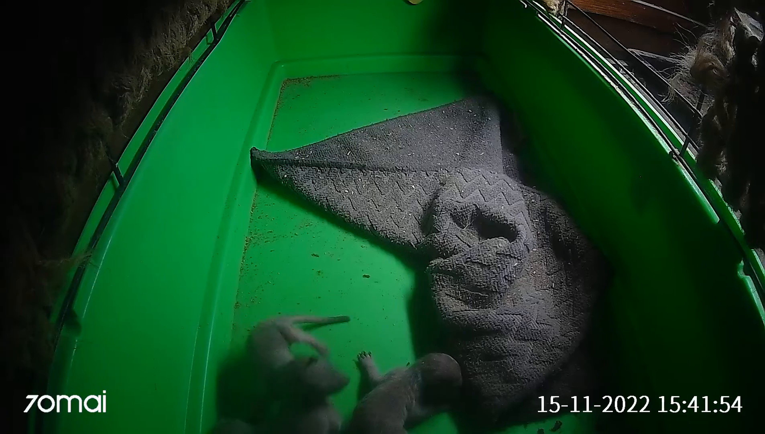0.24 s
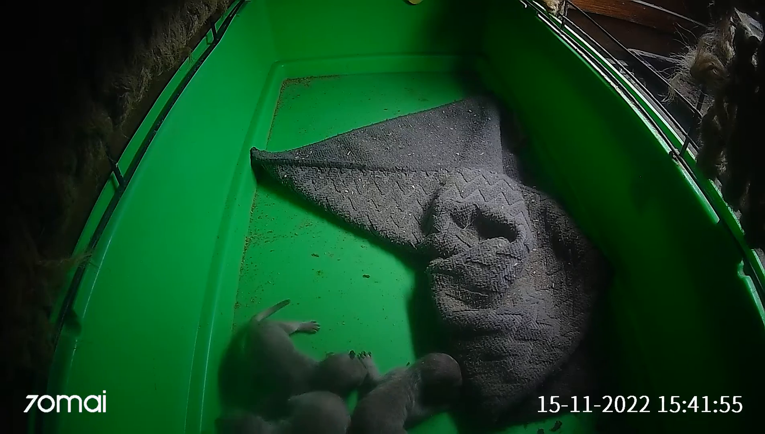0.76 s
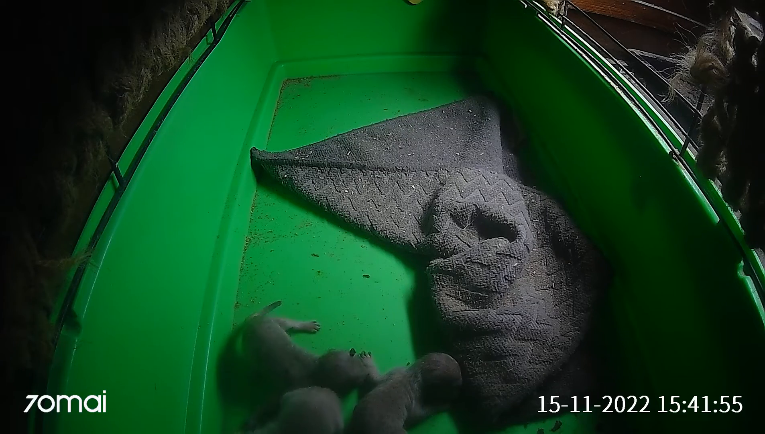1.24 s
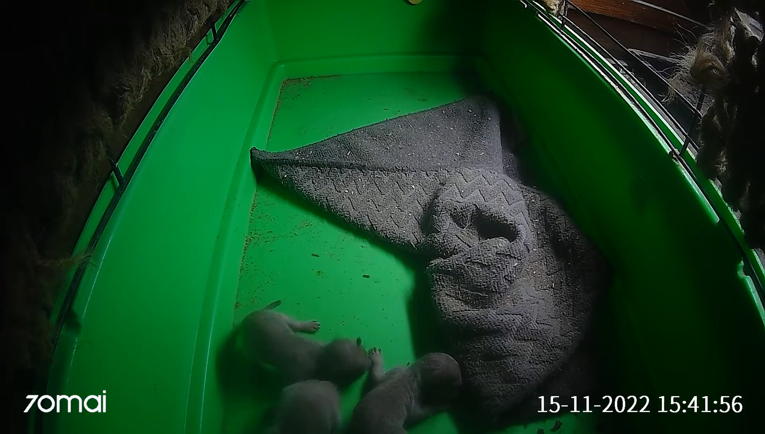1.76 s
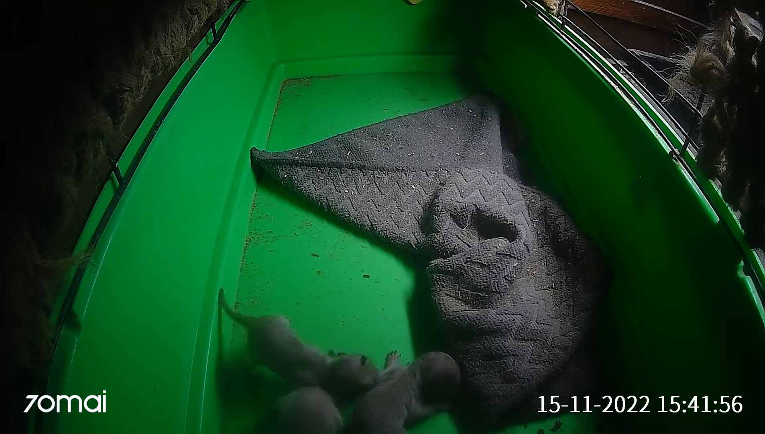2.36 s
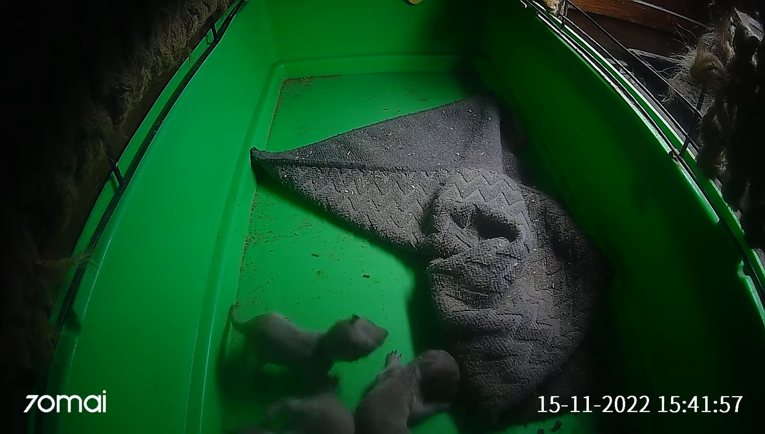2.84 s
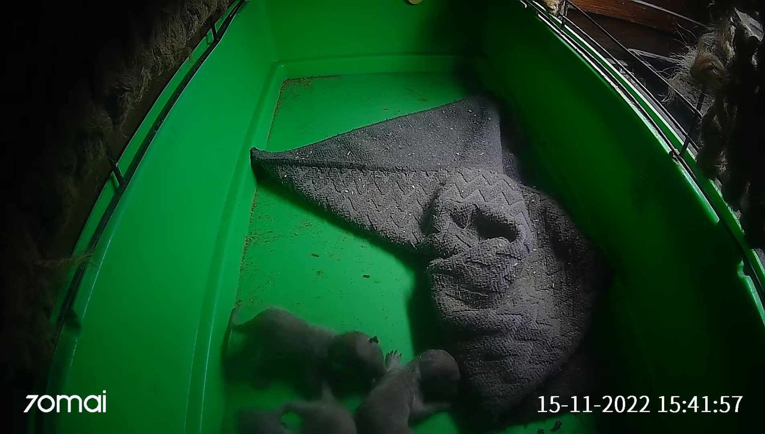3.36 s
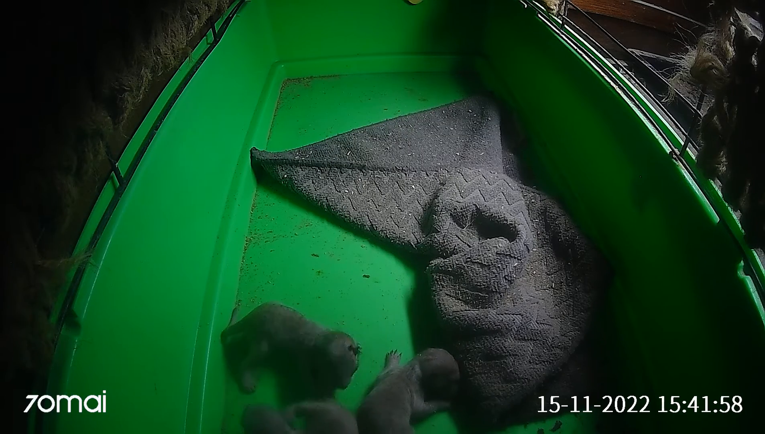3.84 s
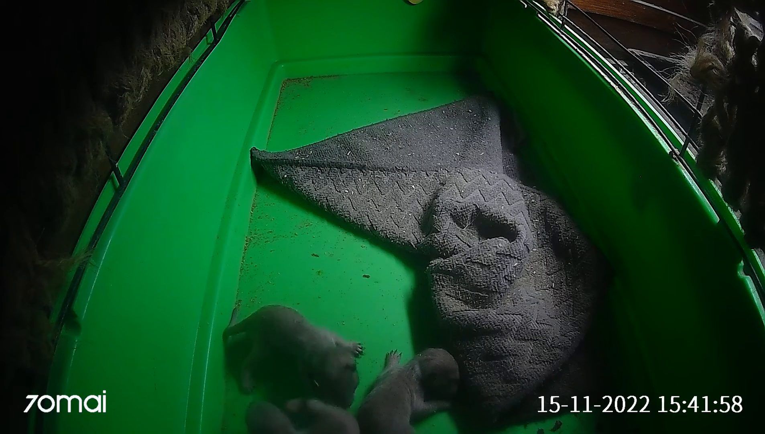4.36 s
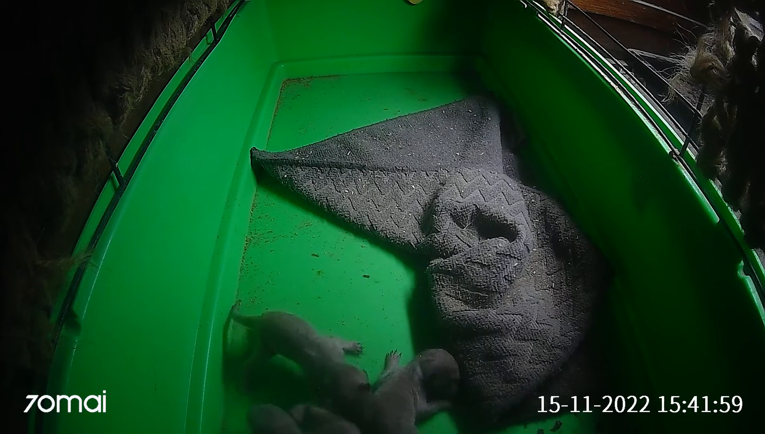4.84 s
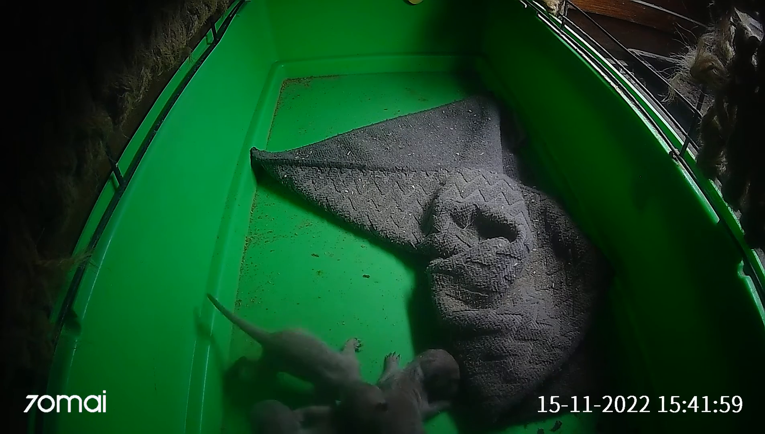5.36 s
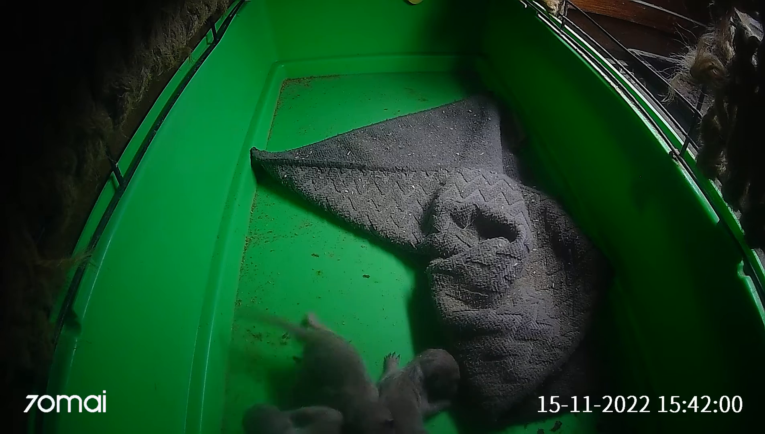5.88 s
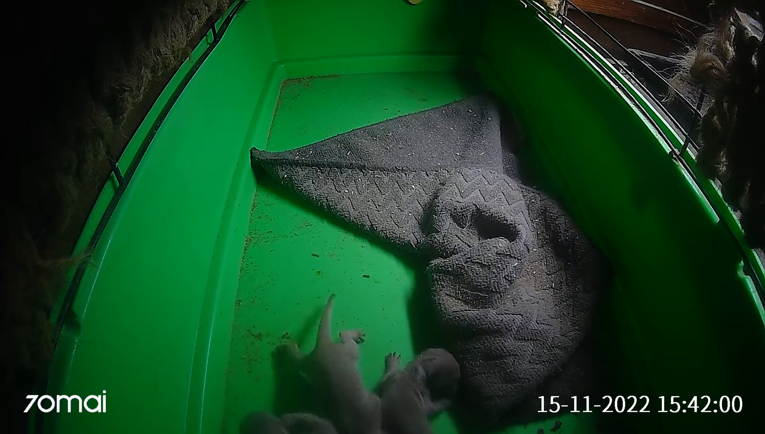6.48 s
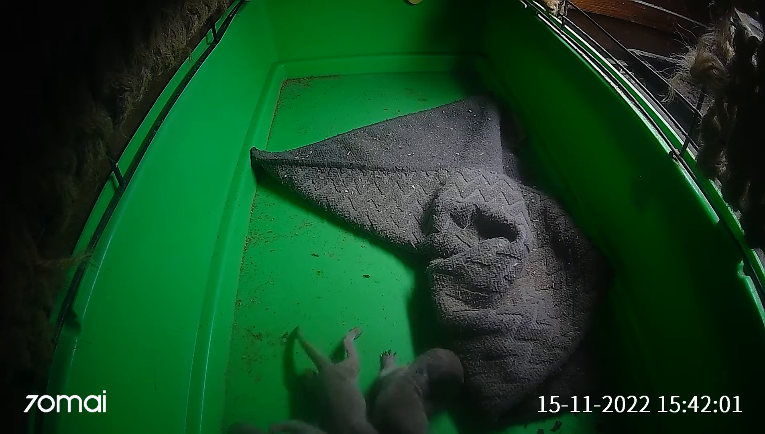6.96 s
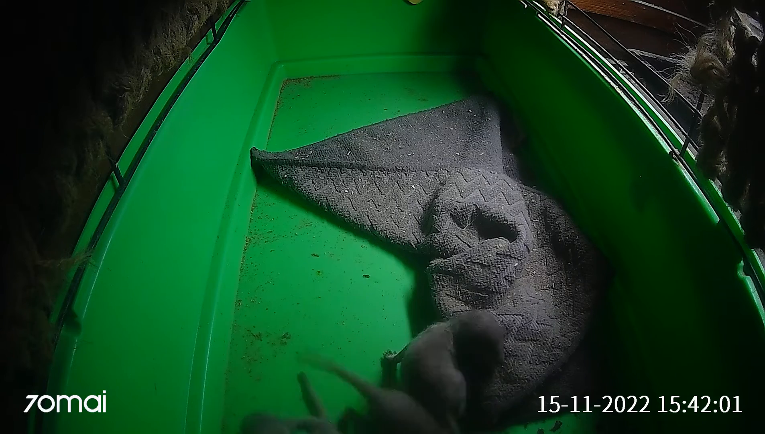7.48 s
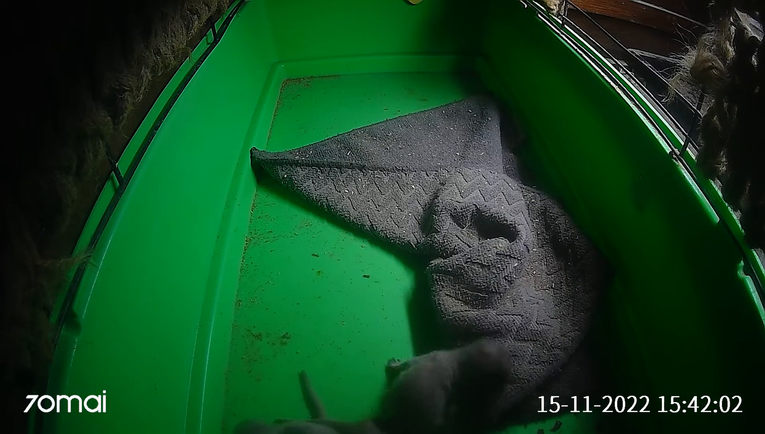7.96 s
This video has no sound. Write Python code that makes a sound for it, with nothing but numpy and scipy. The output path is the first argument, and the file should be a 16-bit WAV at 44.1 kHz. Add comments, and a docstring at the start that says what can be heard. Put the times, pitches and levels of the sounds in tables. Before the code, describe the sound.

Close, short peeps and raspy trills of baby meerkats, rustling on a blanket and bumping their plastic tub over faint hiss.

```python
"""Inside a plastic tub, a small camera microphone close to meerkat pups that peep, trill and whimper.
Each call is a short harmonic note; in a trill, pitch and strength swing together and the voice turns
raspy in the dips. The pups shuffle over the floor and a blanket, tick their claws on the plastic and
bump the tub into a low ring. Underneath lie rumble, microphone hiss and a faint electrical ticking."""
import sys
import numpy as np
from scipy import signal
from scipy.fft import rfft, irfft, next_fast_len
from scipy.io import wavfile

SR = 44100
rng = np.random.default_rng(int(sys.argv[2]) if len(sys.argv) > 2 else 0)


def put_to_file(sound):
    """Save the sound as 16-bit audio at rate SR, in the file named by the first command-line argument."""
    columns = np.atleast_2d(sound).T  # one column per channel
    safe = np.clip(columns, -1, 1)
    whole_steps = np.round(safe * 32767)
    wavfile.write(sys.argv[1], SR, whole_steps.astype(np.int16))


N = 362502
TIME = np.arange(N) / SR

# spectrum of fur and paws rubbing: f/Hz, level/dB
RUB_SPECTRUM = [(150, -16.5), (300, 4), (600, 4), (900, 5.5), (1500, 5), (2400, -0.5), (3500, -3.5),
                (5500, -5.5), (8000, -21)]


def from_db(db):
    """Decibels to gain."""
    return 10 ** (np.asarray(db) / 20)


def unit_rms(x):
    """Scale to unit power."""
    return x / np.sqrt(np.mean(x ** 2) + 1e-20)


def curve(points):
    """A curve of (time, value) points at every sample."""
    return np.interp(TIME, *np.transpose(points))


def gain_at(spectrum, hz):
    """Gain of a spectrum at the given frequencies."""
    f, db = np.transpose(spectrum)
    return from_db(np.interp(np.log(np.maximum(hz, 1)), np.log(f), db))


def noise(spectrum):
    """Steady noise of a given colour, rms 1."""
    size = next_fast_len(N)
    hz = np.fft.rfftfreq(size, 1 / SR)
    no_dc = hz / np.hypot(hz, spectrum[0][0] / 2)
    return unit_rms(irfft(rfft(rng.standard_normal(size)) * gain_at(spectrum, hz) * no_dc, size)[:N])


def lowpass(x, hz):
    """Second-order low-pass."""
    return signal.sosfilt(signal.butter(2, hz, fs=SR, output="sos"), x + 1e-18)


def drift(hz):
    """Random wavering up to a given rate, rms 1."""
    return unit_rms(lowpass(rng.standard_normal(N + SR), hz)[SR:])


def decay(clicks, seconds):
    """Give each click an exponential tail."""
    return signal.lfilter([1], [1, -np.exp(-1 / (seconds * SR))], clicks + 1e-18)


def ring(x, hz, t60):
    """One mode: a unit click sets a sine of height 1 ringing."""
    r, w = from_db(-60 / (t60 * SR)), 2 * np.pi * hz / SR
    return signal.lfilter([0, np.sin(w)], [1, -2 * r * np.cos(w), r * r], x + 1e-18)


def background(floor_db=-56, tick_hz=48.9, tick_chance=0.45, tick_db=-64.5):
    """Rumble and hiss, with faint dull electrical ticks in random slots of a steady beat."""
    # noise floor: f/Hz, relative level/dB
    floor_spectrum = [(12, -27), (20, 1), (59, -3.5), (124, -19.5), (156, -13.5), (222, -15.5),
                      (407, -21.5), (566, -20), (659, -23.5), (1070, -25.5), (1410, -28), (5530, -32.5),
                      (8500, -42), (11000, -87), (18700, -120)]
    slots = np.arange(0, N - 1, SR / tick_hz).astype(int)
    ticks = np.zeros(N)
    ticks[slots] = (rng.random(len(slots)) < tick_chance) * rng.random(len(slots))
    dull = signal.sosfilt(signal.butter(1, 40, "high", fs=SR, output="sos"), lowpass(ticks, hz=216))
    return from_db(floor_db) * noise(floor_spectrum) + from_db(tick_db) * unit_rms(dull)


def rustle(stroke_db=3.5, grain_db=2.0, snags_per_s=25, snag_db=1.5):
    """Fur and paws rub in grainy strokes and claws snag; the same noise gives short rasps by the trills."""
    # how hard the pups rub as they start to clamber: t/s, effort/dB
    clambering = [(5.3, -80), (5.62, -65.5), (5.78, -57), (6.2, -62), (6.45, -60.5), (6.7, -69),
                  (7.14, -64), (7.81, -70), (8.22, -53)]
    # short rasps just before or after a trill (0.5, 0.731, 2.396 s), otherwise soft rubbing swipes:
    # t/s, level/dB, half-width/s
    rasps_and_swipes = [(0.135, -60, 0.21), (0.5, -48.5, .014), (0.731, -50, .012), (2.237, -56.5, 0.0049),
                        (2.264, -63, 0.06), (2.304, -57, 0.01), (2.396, -49.5, 0.011),
                        (4.829, -60.5, 0.019), (5.57, -62, 0.01), (7.865, -55, 0.041)]
    strokes = from_db(stroke_db * drift(hz=15.3) + grain_db * drift(hz=400))
    snags = decay((rng.random(N) < snags_per_s / SR) * rng.random(N), seconds=0.0018)
    grainy = unit_rms((strokes + from_db(snag_db) * snags) * noise(RUB_SPECTRUM))
    bursts = sum(from_db(db) * np.exp(-np.minimum(((TIME - s) / width) ** 2, 20))
                 for s, db, width in rasps_and_swipes)
    rubbing_db = -59 + 1.21 * (curve(clambering) + 63)   # grows a little faster than the effort
    return (from_db(rubbing_db) + bursts) * grainy


def claws(decay_s=0.007, gain_db=8.5):
    """Claws strike the plastic in short, dry ticks of noise."""
    # claw strikes: t/s, relative level/dB
    strikes = [(6.017, -48), (6.949, -53.5), (7.445, -55.5), (7.521, -47)]
    # spectrum of a tick: f/Hz, level/dB
    tick_spectrum = [(300, -6), (600, -5.5), (1500, -1.5), (3000, -9.5), (5000, -23), (8000, -28)]
    envelope = sum(from_db(db + gain_db) * (TIME >= s) * np.exp(-np.minimum(abs(TIME - s) / decay_s, 20))
                   for s, db in strikes)
    return envelope * noise(tick_spectrum)


def tub_bumps(ring_db=-5.5, db_per_octave=8.0, scuff_db=-4.5):
    """A body lands and scuffs along the tub, ringing the modes near the blow's favoured pitch most."""
    # bumps: t/s, relative level/dB, scuff against that level/dB, favoured f/Hz
    bumps = [(0.413, -39, -14, 236), (0.719, -29, -5.5, 104), (0.775, -35.5, -27, 93),
             (5.958, -30, -13, 224), (7.087, -33.5, -28, 105), (7.495, -20.5, -21, 114),
             (7.508, -21.5, -17, 96), (7.637, -37, -3, 470), (7.667, -31, -15, 248),
             (7.812, -31.5, -31, 109)]
    # modes of the tub: f/Hz, level/dB, t60/s
    modes = [(64, -2.5, 0.11), (97.2, -1.5, 0.27), (112.7, -5, 0.23), (147, -24, 0.097), (220, -3, 0.11),
             (280, -7, 0.12), (330, -13.5, 0.26), (474, 6, 0.043), (623, 1, 0.11)]
    s, blow_db, rub_db, favoured_hz = np.transpose(bumps)
    at = (s * SR).astype(int)
    blows, ringing = np.zeros((2, N))
    for hz, mode_db, t60 in modes:
        off_pitch_db = db_per_octave * abs(np.log2(hz / favoured_hz))
        blows[at] = from_db(ring_db + blow_db + mode_db - off_pitch_db + rng.normal(0, 1, len(at)))
        ringing += ring(lowpass(blows, hz=600), hz, t60) * rng.choice([-1, 1])
    blows[at] = from_db(blow_db + rub_db + scuff_db)
    scuff = decay(blows, seconds=0.014) * lowpass(noise(RUB_SPECTRUM), hz=1310)
    return ringing + scuff


def tub_boom(gain_db=1.0):
    """Shifting weight keeps the tub's lowest modes booming."""
    # strength of the shuffling: t/s, relative level/dB
    shuffling = [(0.0, -67), (0.34, -74), (0.82, -61.5), (1.94, -70.5), (2.77, -68), (3.2, -76),
                 (3.66, -68), (3.8, -66.5), (5.13, -69), (5.59, -69.5), (5.97, -52), (6.34, -67.5),
                 (6.94, -59.5), (7.56, -45.5), (8.22, -51.5)]
    # low modes: f/Hz, level/dB, t60/s
    low_modes = [(49.6, -9, 0.2), (99.4, -5.5, 0.15), (117.3, -4, 0.23)]
    push = lowpass(rng.standard_normal(N), hz=162)
    boom = unit_rms(sum(from_db(db) * ring(push, hz, t60) for hz, db, t60 in low_modes))
    return from_db(curve(shuffling) + gain_db) * boom


def whimpers(throb_hz=25.0, second_db=-20.0, third_db=-18.5, attack_s=0.035, release_s=0.016):
    """Nearly pure, low notes from a closed mouth, unsteady and throbbing."""
    # whimpers: start/s, end/s, f/Hz, level/dB, fade over the note/dB
    notes = [(2.623, 2.783, 522, -43.5, 25), (4.228, 4.611, 500.4, -47, 9), (6.02, 6.965, 465.2, -45.5, 8),
             (6.616, 6.974, 331, -57.5, 4), (7.7, 7.965, 471, -58, -1)]
    wobble = 1 + 0.035 * drift(hz=70)
    throb = 1 + 0.5 * np.cos(2 * np.pi * throb_hz * TIME) + 0.5 * drift(hz=65.5)
    out = np.zeros(N)
    for start, end, hz, db, fade_db in notes:
        span = slice(int(start * SR), int(end * SR))
        t = TIME[span]
        progress = (t - start) / (end - start)
        pitch = hz * (1 + 0.16 * np.exp(-progress / 0.06))   # starts high and settles
        phase = 2 * np.pi * np.cumsum(pitch * wobble[span]) / SR
        note = np.sin(phase) + from_db(second_db) * np.sin(2 * phase)
        note += from_db(third_db) * np.sin(3 * phase)
        gate = np.clip(np.minimum((t - start) / attack_s, (end - t) / release_s), 0, 1)
        out[span] += from_db(db - fade_db * progress) * gate * unit_rms(note * throb[span])
    return out


def throat(phase, pitch, note_hz, overtones_db, odd_db=-4.0, waver_db=6.0, waver_s=0.012):
    """Two low harmonics, and overtones coloured by the throat: odd ones weaker, each wavering alone."""
    # throat response: f/Hz, level/dB
    response = [(1500, 20.5), (2200, 3.5), (2550, 1), (2900, -1), (3500, -8), (4300, -8.5), (5200, -14.5),
                (6000, -32), (8000, -28.5)]
    # fundamental against the second harmonic, by pitch of the note: f/Hz, level/dB
    fundamental = [(600, -2), (700, -9.5), (780, -15.5), (880, 0), (960, -6), (1060, 4.5), (1250, 12),
                   (1650, 6.5)]
    k = np.arange(3, 15)[:, None]
    steps = np.arange(len(phase)) / (waver_s * SR)
    waver = np.array([np.interp(steps, np.arange(30), row) for row in rng.normal(0, 1, (len(k), 30))])
    gains = gain_at(response, k * pitch) * from_db(odd_db * (k % 2) + waver_db * waver)
    gains *= k * pitch < SR / 4
    smear = 0.55 * (k - 2) ** 2   # higher partials come later in each pulse
    overtones = unit_rms(np.sum(gains * np.cos(k * phase - smear), axis=0))
    low = gain_at(fundamental, note_hz) * np.cos(phase) + np.cos(2 * phase)
    return unit_rms(low + from_db(overtones_db) * overtones / np.sqrt(2))


def call(row, noises, release_s=0.0033, jitter=0.061, shimmer=0.25, rasp_db=0.5, hiss_db=-23.5):
    """One peep or trill: the voice arches, lower, weaker and rougher at its ends and in trill dips."""
    start, end, hz, glide, db, fade_db, overtones_db, rough, *trill = row
    span = slice(int(start * SR), min(int((end + release_s) * SR), N))
    t, length = TIME[span] - start, end - start
    flutter, shake, rasp, hiss, bend = noises[:, span]
    progress = np.clip(t / length, 0, 1)
    from_middle = progress - 0.5
    edge = (2 * from_middle) ** 2
    catch = 1 + 0.1273 * np.exp(-t / 0.00318)   # starts high and settles at once
    pitch = hz * (1 + glide * from_middle - 0.05204 * edge) * catch
    level_db = db - fade_db * from_middle - 5.5 * edge
    rough = rough * (1 + 1.2 * edge)
    if trill:
        rate, delay, swing_db, swing_hz = trill
        since = t - delay
        dip = np.sin(np.pi * rate * np.maximum(since, 0)) ** 2
        # pitch trails strength, so that every pulse swoops upward
        pitch_dip = np.sin(np.pi * rate * np.maximum(since - 0.0022, 0)) ** 2
        climb = 1 - 0.0594 * np.clip(-since / 0.0206, 0, 1)   # rises into the trill
        pitch = pitch * climb - swing_hz * pitch_dip
        level_db -= swing_db * dip
        rough *= 0.15 + 1.93 * dip
    else:
        push_db = 2 * np.exp(-((progress - 0.6) / 0.071) ** 2)   # a peep is pushed just past its middle
        level_db += push_db - push_db.mean()
    rough = np.clip(rough, 0, 1)
    phase = 2 * np.pi * np.cumsum(pitch * (1 + 0.012 * bend + jitter * rough * flutter)) / SR
    bloom_db = -2 * np.exp(-t / 0.011)   # the overtones come in after the lowest partials
    voice = throat(phase, pitch, hz, overtones_db + bloom_db) * (1 + shimmer * rough * shake)
    # air escapes in puffs, once a cycle
    air = (1 + 0.63 * np.cos(phase)) * (from_db(rasp_db) * rough * rasp + from_db(hiss_db) * hiss)
    attack_s = 0.004 * (930 / hz) ** 2.94   # lower voices speak more slowly
    attack = np.clip(t / attack_s, 0, 1)
    release = np.clip((length + release_s / 2 - t) / (2 * release_s), 0, 1) ** 2
    return span, from_db(level_db) * attack * release * unit_rms(voice + air)


def pups():
    """Peeps and trills close to the microphone, roughened by unsteady voicing and breath."""
    # plain calls: start/s, end/s, f/Hz, glide/share of f, level/dB, fade/dB, overtones/dB, roughness
    peeps = [(0.147, 0.232, 1052, -0.069, -50, 10.5, -6.5, 0.03),
             (0.422, 0.49, 894, -0.018, -38, 8, -14, 0.12),
             (0.818, 0.838, 1198, -0.096, -59.5, 31, -8, 0.4),
             (0.985, 1.03, 1020, 0.011, -31.5, -1, -15, .11),
             (1.068, 1.118, 1029, 0.052, -43.5, 13, 0.5, 0.45), (1.11, 1.152, 1286, 0.16, -42, 3, 4, 0.6),
             (1.148, 1.22, 1310, -0.15, -49.5, 22, -3, 0), (1.745, 1.775, 1137, -0.11, -51.5, 8, -6, 0.12),
             (1.987, 2.034, 964, 0.093, -28, -2.5, -7.5, 0.03), (2.024, 2.031, 957, 0.036, -27, 1, 8, 0.45),
             (2.03, 2.08, 867, -0.06, -41, 14, -8, 0.1), (2.075, 2.142, 822, 0.016, -45.5, 8, -22, 0.65),
             (3.256, 3.335, 723, .03, -31, 0, -11, 0.07), (3.82, 3.857, 613, -0.2, -40.5, 2, -2, 0.31),
             (3.866, 3.893, 759, -.1, -45.5, 28, -15, 0.9), (4.627, 4.704, 750, 0.15, -32, 0.5, -9, 0.06),
             (5.138, 5.185, 1036, -0.17, -38.5, 2, -8.5, 0.1),
             (5.347, 5.394, 1643, 0.031, -38, -9, -7.5, 0.09), (5.8, 5.828, 1473, -.07, -38.5, 6, -5, 0.14),
             (6.144, 6.164, 1607, -0.047, -43.5, 8, -20, 0.01),
             (6.383, 6.432, 1347, -0.198, -41, 8.5, -4, 0.17),
             (6.599, 6.646, 1060, -0.038, -38, 5, 0.5, 0.12),
             (6.971, 6.998, 1212, 0.0042, -44, 7, 14.5, 0.37),
             (7.163, 7.222, 619, 0.012, -43.5, 9, -4.5, 0.7),
             (7.215, 7.248, 720, 0.12, -46.5, 14, -1.5, 0.25),
             (7.483, 7.528, 985, 0.044, -37.5, 8.5, 1, 0.25),
             (7.579, 7.625, 1020, -0.04, -48.5, 0, -6, 0.17), (8.091, 8.17, 886, -.06, -39, 7, 6, 0.14),
             (8.165, 8.219, 896, 0.13, -45, 0, 4, 1.1)]
    # trilled calls: the same columns, then trill rate/Hz, delay/s, level swing/dB, pitch swing/Hz
    trills = [(0.249, 0.351, 775, -0.087, -25, -1, 0, 0.25, 31.5, 0.021, 10, 139),
              (0.515, 0.716, 762, -0.15, -26, 5.5, -1, 0.3, 38.47, 0.031, 15.5, 180.3),
              (2.404, 2.533, 791, -0.015, -28.5, 4, -1.5, 0.2, 44.3, .023, 5.5, 149.3),
              (2.794, 2.96, 916, 0.027, -40, 12, -7.5, 0.35, 34.8, 0.0062, 11, 97.7),
              (3.638, 3.742, 971.5, 0.0035, -32, 5.5, -10.5, 0.37, 44.8, .024, 15, 106.4),
              (3.742, 3.809, 962, -0.031, -33, -8.5, -12, 0.77, 43.2, 0.0045, 56, 116.6),
              (4.323, 4.438, 969.6, -.07, -32, 6.5, -18.5, 0.45, 39.5, 0.0145, 17.5, 129.5),
              (4.871, 4.945, 1001, -0.06, -33, 2.5, -9.5, 0.19, 34.8, 0.0017, 8, 117),
              (5.664, 5.778, 736.4, 0.00046, -33, -0.5, -9, 0.1, 36.5, 0.034, 0.5, 82.2),
              (7.068, 7.168, 719.3, -0.081, -33, 0.5, -4.5, 0.07, 33.1, 0.0037, 1.5, 51.5)]
    # rasp in the voice: f/Hz, level/dB
    rasp = [(300, -27.5), (700, -15), (1100, -5), (1500, -1.5), (2000, -2), (2900, -16), (4300, -13.5),
            (5500, -21.5), (8000, -31.5)]
    # hiss of the breath: f/Hz, level/dB
    hiss = [(300, -27.5), (1000, -8), (4000, 2.5), (5500, 5), (7000, 4), (8500, -6)]
    flutter, shake = drift(hz=362), drift(hz=410)
    noises = np.array([flutter, shake, noise(rasp), noise(hiss), drift(hz=60)])
    out = np.zeros(N)
    for row in list(peeps) + list(trills):
        span, sound = call(row, noises)
        out[span] += sound
    return out


def walls(x, t60=0.044, wet_db=-15.5, gap_s=0.0033):
    """Quick, dull reflections between the tub's near walls."""
    t = TIME[:SR // 4]
    echoes = lowpass(rng.standard_normal(len(t)), hz=3240) * from_db(-60 * t / t60) * (t > gap_s)
    return x + from_db(wet_db) * signal.fftconvolve(x, echoes / np.linalg.norm(echoes))[:N]


def scene():
    """Voices and movement in the tub, close up and in mono, over the noise floor."""
    calls_and_claws = walls(pups() + whimpers() + claws())
    return (calls_and_claws + tub_bumps() + tub_boom() + rustle() + background())[None]


def record(dry, rolloff_hz=7900, cutoff_hz=8500):
    """The small camera rolls off the top treble and passes nothing above its cut-off."""
    soft = signal.sosfilt(signal.butter(12, rolloff_hz, fs=SR, output="sos"), dry)
    return signal.sosfilt(signal.ellip(10, 0.1, 80, cutoff_hz, fs=SR, output="sos"), soft)


dry = scene()
out = record(dry)
put_to_file(out)
```